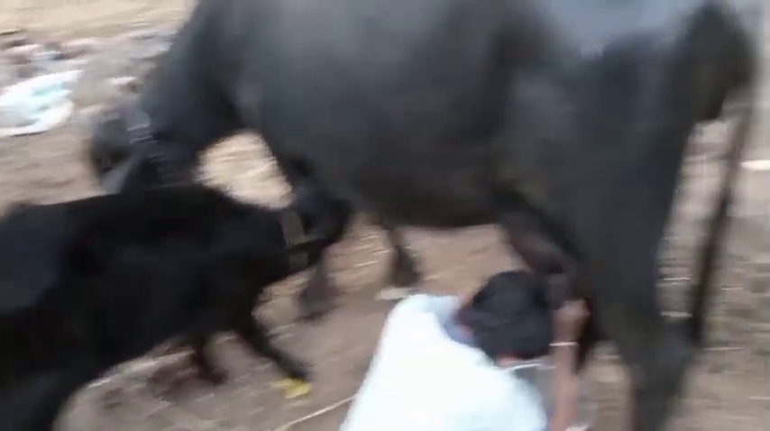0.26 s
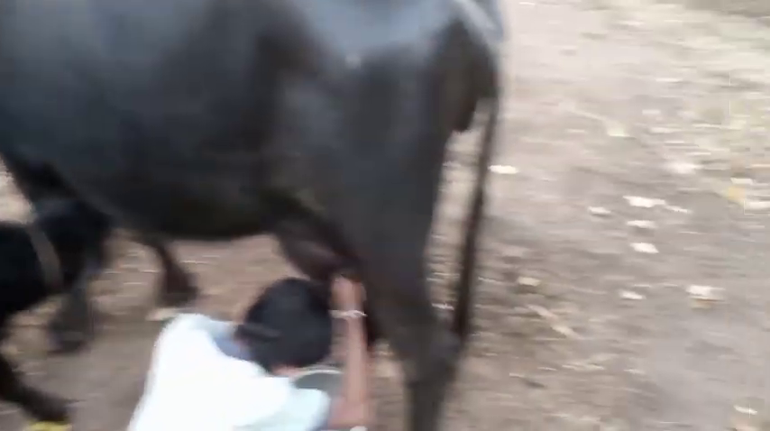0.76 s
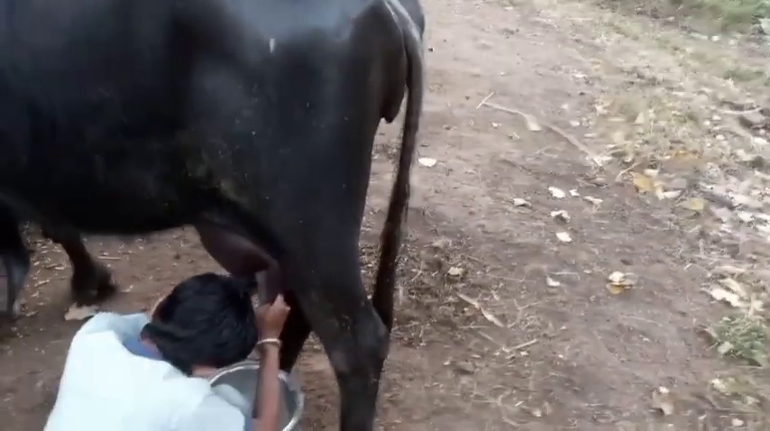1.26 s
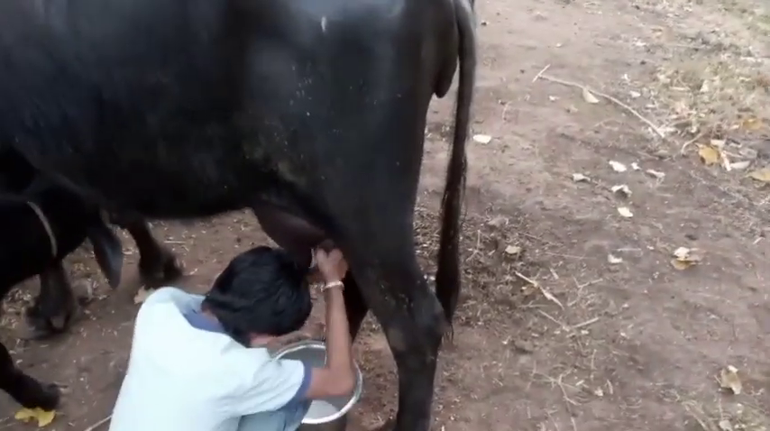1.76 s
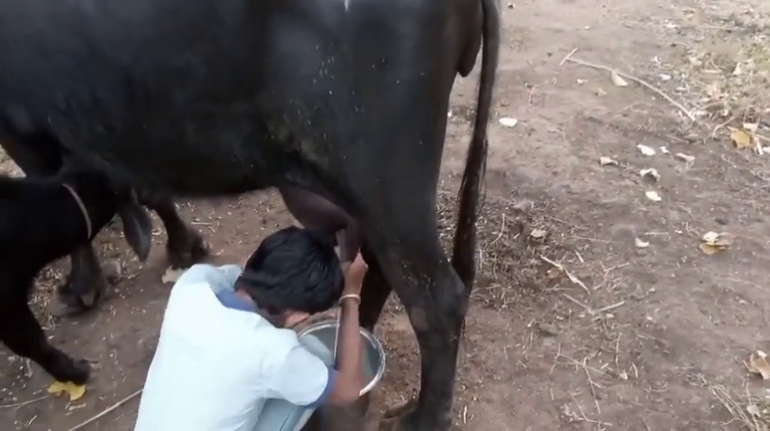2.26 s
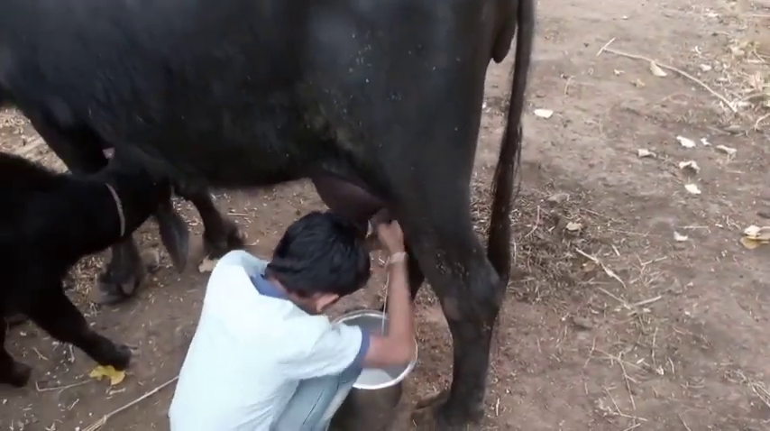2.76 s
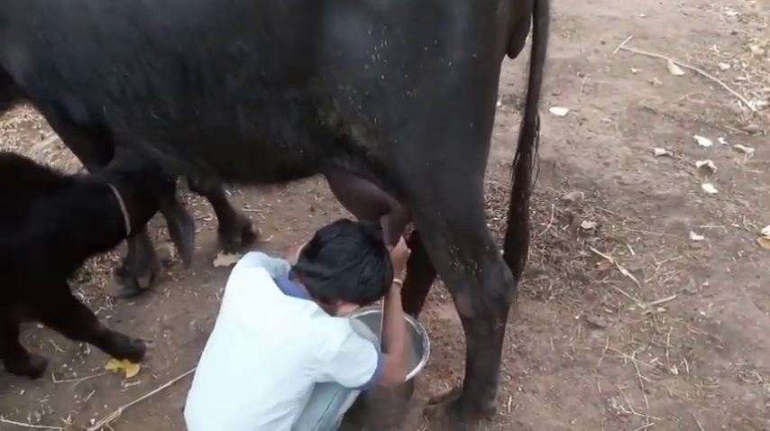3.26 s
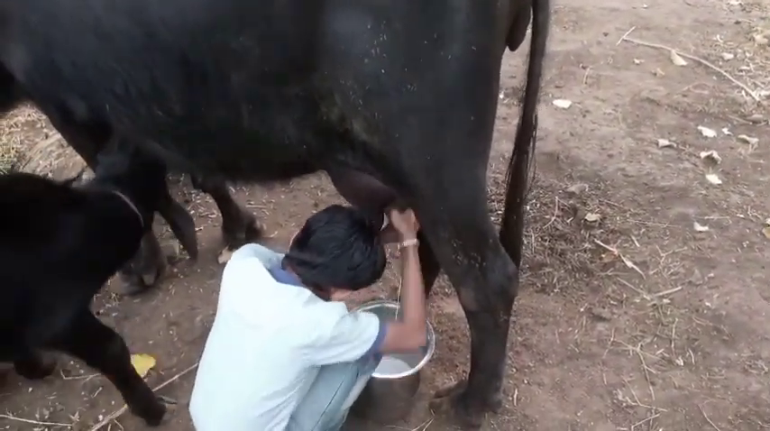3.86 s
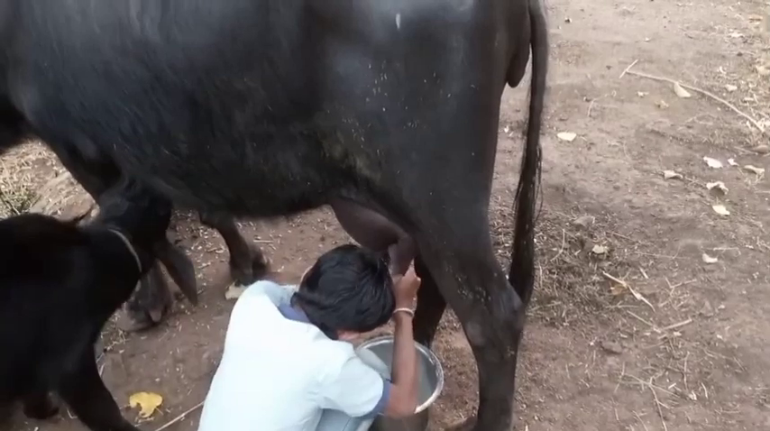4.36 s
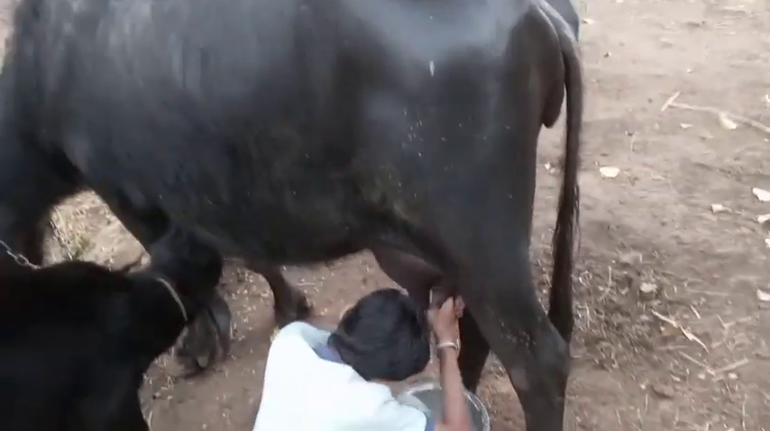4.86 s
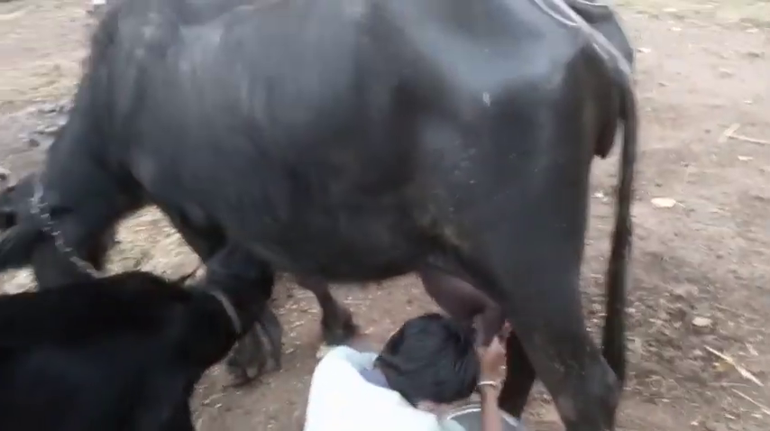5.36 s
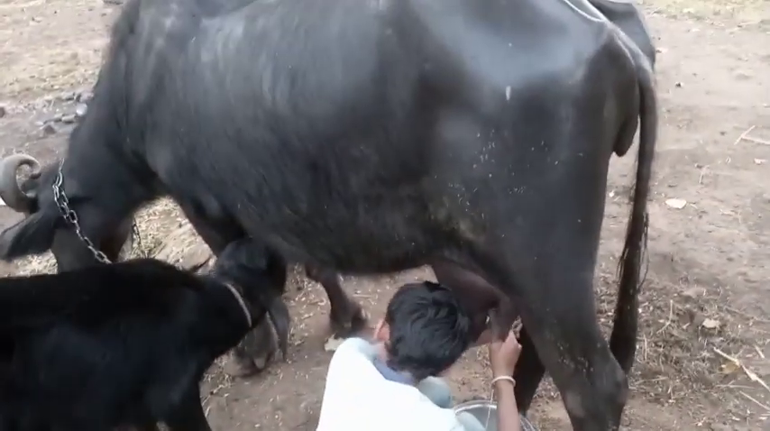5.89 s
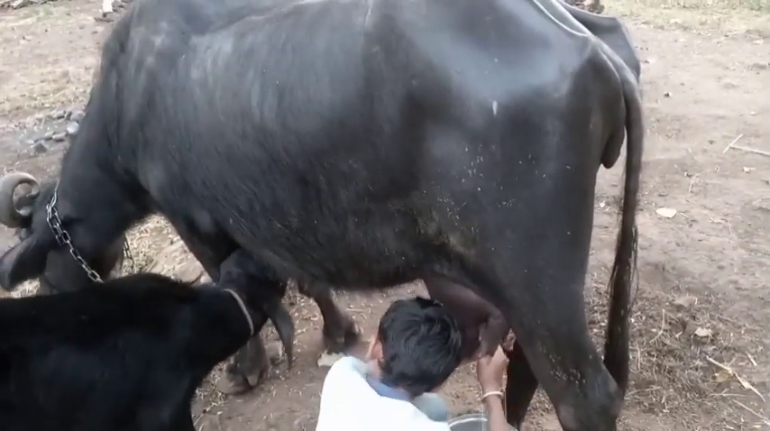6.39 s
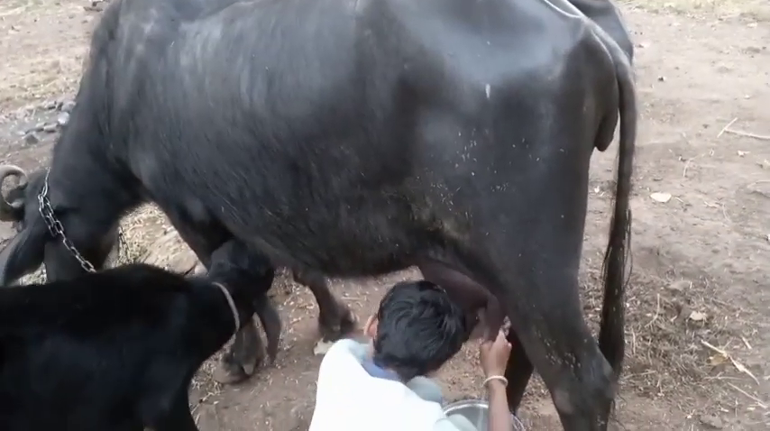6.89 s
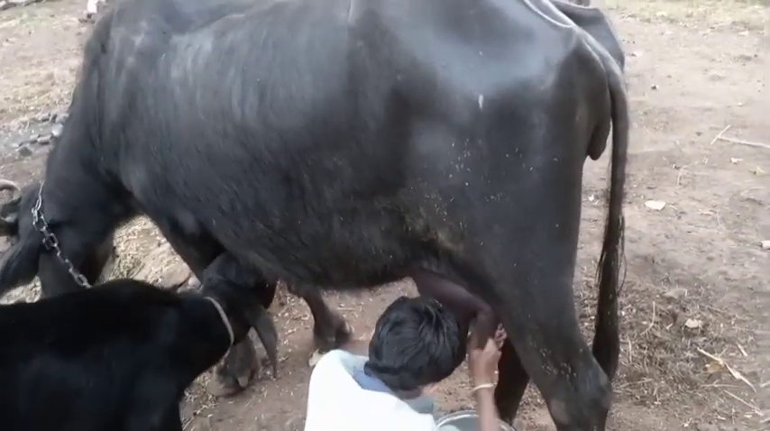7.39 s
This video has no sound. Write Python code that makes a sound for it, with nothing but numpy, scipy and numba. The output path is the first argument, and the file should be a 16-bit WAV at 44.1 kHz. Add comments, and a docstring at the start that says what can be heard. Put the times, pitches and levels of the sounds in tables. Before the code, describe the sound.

Buffalo milk squirts in quick rhythmic jets into a frothy steel pail, hissing and gurgling, with a sharp click and faint bird notes in quiet outdoor air.

```python
"""In an open yard, a buffalo is milked by hand into a steel pail that already holds frothy milk.
Each jet first splashes and sprays droplets on the froth, then digs in and churns up larger, lower bubbles.
Swarms of ringing bubbles and fine hiss make the milk and foam; echoes and moving resonances make the pail.
Around it lie a sharp click, dull thuds and a few gliding bird notes made of plain sines,
with hooves shifting and quiet outdoor air made of filtered noise."""
import sys
import numpy as np
from scipy import signal
from scipy.fft import rfft, irfft
from scipy.io import wavfile
from scipy.ndimage import uniform_filter1d, map_coordinates
from numba import njit

SR = 44100
rng = np.random.default_rng(int(sys.argv[2]) if len(sys.argv) > 2 else 0)


def pcm_store(signal):
    """Save signal as 16-bit PCM."""
    levels = np.round(np.clip(np.atleast_2d(signal), -1, 1) * 32767)
    wavfile.write(sys.argv[1], SR, levels.astype(np.int16).T)


N = 336483
T = np.arange(N) / SR


def undb(db):
    """Decibels to gain."""
    return 10 ** (np.asarray(db) / 20)


def curves(table):
    """The columns of a table, joined by straight lines in time."""
    s, *columns = np.transpose(table)
    return [np.interp(T, s, column) for column in columns]


def current_row(times):
    """Which row of a table holds at each moment: the latest one to have started."""
    return np.maximum(np.searchsorted(times, T, "right") - 1, 0)


def colour(x, points):
    """Shape the tone to a (frequency [Hz], level [dB]) outline, without any sound before its cause."""
    hz, db = np.transpose(points)
    size = 2048
    grid = np.maximum(np.fft.rfftfreq(size, 1 / SR), 1)
    outline_db = np.interp(np.log(grid), np.log(hz), db)
    # folding the cepstrum forward in time gives a minimum-phase filter
    cepstrum = irfft(np.log(undb(outline_db)))
    cepstrum[1:size // 2] *= 2
    cepstrum[size // 2 + 1:] = 0
    impulse = irfft(np.exp(rfft(cepstrum)))
    return signal.fftconvolve(x, impulse)[:len(x)]


def high_pass(order, hz):
    """Filter sections that keep what lies above hz."""
    return signal.butter(order, hz, "high", fs=SR, output="sos")


def steady(x, span_s):
    """Even out the loudness to about unit rms over each span; quicker flutter stays."""
    power = uniform_filter1d(x * x, int(span_s * SR))
    power = uniform_filter1d(power, int(span_s * SR / 2))
    return x / np.sqrt(np.abs(power) + 1e-12)


def walk(rate):
    """A random wander with unit spread: a new level every 1 / rate seconds, joined smoothly."""
    hold = int(SR / rate)
    levels = np.repeat(rng.standard_normal(N)[:N // hold + 1], hold)
    wander = uniform_filter1d(levels, hold)[:N]
    return wander / wander.std()


def add(out, s, sound, db):
    """Lay a short sound into the track at the given peak level."""
    i = max(int(s * SR), 0)
    scaled = sound * undb(db) / np.abs(sound).max()
    out[i:i + len(sound)] += scaled[:max(N - i, 0)]


@njit
def band(x, hz, width):
    """Band-pass whose centre and width may move; gain 1 at the centre."""
    y, b, low = np.empty(len(x)), 0., 0.
    for i in range(len(x)):
        g, k = np.tan(np.pi * hz[i] / SR), width[i] / hz[i]
        v = (b + g * (x[i] - low)) / (1 + g * (g + k))
        b, low, y[i] = 2 * v - b, low + 2 * g * v, k * v
    return y


def resonate(x, hz, width_hz, lift_db):
    """Lift the sound around a moving resonance."""
    return x + (undb(lift_db) - 1) * band(x, hz, width_hz * np.ones(N))


@njit
def ring(start, hz, cycles, size, rise):
    """Each bubble is a damped sine whose pitch climbs as it nears the surface."""
    out = np.zeros(N)
    for k in range(len(start)):
        life, phase = cycles[k] * SR / hz[k], 0.  # life in samples
        first = int(start[k] * SR)
        for i in range(min(int(life), N - first)):
            phase += 2 * np.pi * hz[k] * (1 + rise * i / life) / SR
            out[first + i] += size[k] * np.exp(-6 * i / life) * np.sin(phase)
    return out


def bubbles(low_hz, high_hz, per_s, cycles, spread_db, rise):
    """A swarm of bubbles of uneven strength, pitched between two edges that may move."""
    when, pitch, life, size = rng.random((int(per_s * N / SR), 4)).T
    start = when * N / SR
    low = np.interp(start, T, low_hz * np.ones(N))
    high = np.interp(start, T, high_hz * np.ones(N))
    strength = undb(-spread_db * np.log(np.maximum(size, .02)))
    return ring(start, low * (high / low) ** pitch, cycles * (.5 + life), strength, float(rise))


def spatter(per_s, spread_db, hiss_db):
    """Dense ticks of very uneven size over a thin hiss."""
    signs = rng.choice([-1, 1], N)
    sizes = undb(spread_db * np.minimum(rng.exponential(size=N), 5))
    ticks = (rng.random(N) < per_s / SR) * signs * sizes
    return ticks / ticks.std() + undb(hiss_db) * rng.standard_normal(N)


def walls(x, count=6):
    """The sound bounces across the pail; the paths shift as the jet wanders, so the colour keeps changing."""
    echo, path_s, wander_s = .22, .0006, .00017  # gain of each bounce; its delay; how far the delay drifts
    out = x.copy()
    for k in range(count):
        drift = wander_s * uniform_filter1d(walk(4), SR // 5)
        lag = path_s * (k + 1 + rng.random()) + drift
        out += echo * map_coordinates(x, [(T - lag) * SR], order=3)
    return out


# tone of the quiet outdoor air: (frequency [Hz], relative level [dB])
YARD = [(25, -19), (60, -3.5), (120, 1.5), (250, -7), (600, -8), (950, -6.5), (1500, -4), (5000, -17),
        (15000, -20)]


def yard(level_db=-69.7, swell_db=1.4, per_s=5.6):
    """Quiet outdoor air: shaped noise that swells and sinks a little."""
    air = colour(rng.standard_normal(N), YARD)
    return air / air.std() * undb(level_db + swell_db * walk(per_s))


# stretches of jet flow; one pull on a teat may take several rows:
# (start [s], length [s], swell to full pressure [s], digs in after [s],
# pressure fade after the swell [dB/s], pitch of the largest bubbles once deep [Hz],
# then levels at full pressure: splash [dB], spray [dB], foam fizz [dB], churning [dB])
FLOWS = [(0.0, 0.1, 0.0021, 0.062, 4, 410, -57.5, -57.5, -61, -63),
         (0.121, 0.12, 0.039, 0.021, 42, 535, -51.5, -47, -47, -64),
         (0.255, 0.23, 0.021, 0.2, 7.5, 468, -48.5, -52.5, -55.5, -56.5),
         (0.573, .51, 0.083, 0.11, 17, 333, -48, -53, -57, -56),
         (1.105, 0.096, 0.016, 0.095, 24, 450, -47.5, -52, -55, -47.5),
         (1.195, 0.16, 0.03, 0.032, 24, 398, -37.5, -51, -56.5, -51),
         (1.349, 0.24, 0.1, 0.0018, 47, 315, -47.5, -51.5, -56.5, -56.5),
         (1.605, 0.26, 0.11, 0.14, 26, 335, -44, -50, -56.5, -53.5),
         (1.909, 0.21, 0.0072, 0.049, 29, 393, -56, -56.5, -63, -56),
         (2.084, 0.34, 0.11, 0.008, 31, 500, -47.5, -47, -55, -57.5),
         (2.271, 0.31, 0.11, 0.0026, 11, 318, -49.5, -54.5, -54.5, -56.5),
         (2.618, 0.23, 0.041, 0.036, 20, 405, -49.5, -48.5, -55.5, -57),
         (2.871, 0.21, 0.011, 0.092, 45, 544, -55.5, -56.5, -56, -58),
         (3.096, 0.045, 0.029, 0.081, 18, 600, -49, -50.5, -54.5, -43),
         (3.154, 0.13, 0.054, 0.088, 15, 776, -42, -47.5, -50.5, -47.5),
         (3.293, 0.055, 0.019, 0.0016, 17, 302, -43, -44, -48, -47.5),
         (3.383, 0.28, 0.036, 0.012, 70, 483, -43.5, -45.5, -48, -49),
         (3.687, 0.43, 0.14, 0.12, 53, 310, -47.5, -48.5, -53.5, -55.5),
         (4.05, 0.1, 0.075, 0.0096, 23, 327, -54.5, -52, -71, -68),
         (4.195, 0.11, 0.022, 0.01, 12, 418, -65, -54.5, -54.5, -61.5),
         (4.317, 0.4, 0.17, 0.0284, 35, 332, -51, -51.5, -50.5, -53.5),
         (4.726, 0.27, 0.059, 0.043, 22, 392, -50, -49, -49.5, -55),
         (4.985, 0.35, 0.055, 0.002, 37, 430, -58, -61.5, -56, -59),
         (5.373, 0.53, 0.17, 0.18, 20, 395, -53.5, -53.5, -54, -52.5),
         (5.889, 0.37, 0.081, 0.034, 15, 433, -55.5, -59, -58, -65),
         (6.195, 0.26, 0.022, 0.022, 13, 374, -67, -74, -59, -77),
         (6.532, 0.26, 0.016, 0.13, 23, 308, -53, -57.5, -52.5, -62),
         (6.769, 0.26, 0.037, 0.0018, 42, 385, -49, -55.5, -51, -54.5),
         (7.07, 0.2, 0.03, 0.028, 43, 360, -53.5, -55, -50.5, -56),
         (7.271, 0.34, 0.008, 0.029, 14, 458, -66, -56.5, -56.5, -60.5),
         (7.567, .1, 0.029, .12, 17, 500, -50, -61, -55, -53)]
ATTACK_S, RELEASE_S, SWELL_DB = 0.0016, 0.037, 7  # the flow starts, stops; the pressure builds by this much
SPRAY_SHARE, FIZZ_SHARE, CHURN_SHARE = 0.94, 1, 0.71  # how closely each follows the pressure
SHALLOW_HZ, SINK_S = 1111, 0.019  # largest bubbles while the jet is on the froth; time it takes to sink
BREAK_S, CLEAR_S = 0.026, 0.021  # time to break through the froth; for a new flow to still old churning
FROTH_SPRAY_DB, SHALLOW_DB = 3, -18  # change in spray and in churning while the jet is on the froth
REST_DB = [[-66], [-62], [-58], [-77]]  # milk settling between flows: splash, spray, fizz, churning


def jets(waver_db=1.15, waver_per_s=16):
    """Each stretch of flow swells and fades with the hand's pressure, breaks through the froth and sinks.
    Gives the levels in dB of splash, spray, fizz and churning, and the pitch of the largest bubbles."""
    power = undb(REST_DB) ** 2 * np.ones(N)
    dig_hz = np.full(N, float(SHALLOW_HZ))
    for s, length, swell, digs, fade, deep_hz, splash_db, spray_db, fizz_db, churn_db in FLOWS:
        span = slice(max(int(s * SR), 0), int((s + 2 * length) * SR))
        age = np.maximum(T[span] - s, 0)
        flow = np.minimum(age / ATTACK_S, 1) * np.exp(-np.maximum(age - length, 0) / RELEASE_S)
        pressure_db = -SWELL_DB * np.maximum(1 - age / swell, 0) - fade * np.maximum(age - swell, 0)
        on_froth = .5 - .5 * np.tanh((age - digs) / BREAK_S)  # 1 on the froth, 0 once through
        # a jet on the froth ends the churning left from before
        power[3, span] *= 1 - flow * on_froth * (1 - np.exp(-age / CLEAR_S))
        levels_db = [splash_db + pressure_db,
                     spray_db + SPRAY_SHARE * pressure_db + FROTH_SPRAY_DB * on_froth,
                     fizz_db + FIZZ_SHARE * pressure_db,
                     churn_db + CHURN_SHARE * pressure_db + SHALLOW_DB * on_froth]
        power[:, span] += (flow * undb(levels_db)) ** 2
        sinking = np.exp(-np.maximum(age - digs, 0) / SINK_S)
        dig_hz[span] = deep_hz + (SHALLOW_HZ - deep_hz) * sinking
    levels = [10 * np.log10(p) + waver_db * walk(waver_per_s) for p in power]
    return *levels, dig_hz


# each spot where the jet lands wakes the pail differently:
# (from time [s], hollow resonance [Hz], bright resonance [Hz], lift of the bright one [dB])
LANDINGS = [(0, 1970, 2650, 9), (.125, 1990, 4550, 3.5), (.254, 1890, 2910, 7.5), (.57, 2090, 3280, 6.5),
            (1.102, 2190, 3250, 4), (1.197, 2180, 3450, 6.5), (1.61, 2150, 3980, 6),
            (1.75, 1880, 3550, 6.5), (2.078, 2100, 3900, 3), (2.861, 1920, 4180, 8),
            (3.11, 2060, 3980, 8.5), (3.391, 1930, 4280, 6), (4.049, 1920, 4180, 7.5),
            (4.721, 2050, 4550, 8), (4.989, 1930, 2950, -2), (5.379, 2020, 4230, 5.5),
            (5.95, 2010, 2990, 2.5), (6.533, 1860, 3250, 7.5), (7.271, 2080, 3100, 12.5),
            (7.36, 2020, 3060, 6.5), (7.57, 2040, 3200, 16)]


def landings(hollow_drift=.018, bright_drift=.035):
    """The pail's two resonances waver while the jet stays near one spot, and slide quickly to the next."""
    s, *columns = np.transpose(LANDINGS)
    spot = current_row(s)
    hollow_hz, bright_hz, lift_db = (uniform_filter1d(c[spot], SR // 50) for c in columns)
    return hollow_hz * (1 + hollow_drift * walk(25)), bright_hz * (1 + bright_drift * walk(30)), lift_db


def beads(per_s=70, decay_s=.003, depth=.7):
    """The jet breaks into beads: each lifts the sound at once and fades in a few milliseconds."""
    hits = (rng.random(N) < per_s / SR) * rng.uniform(0.98, 1, N)
    return 1 + depth * signal.lfilter([1], [1, -np.exp(-1 / (decay_s * SR))], hits)


# tone of the splash inside the pail: (frequency [Hz], relative level [dB])
SPLASH = [(900, -49), (1280, -8), (1470, 2.5), (1600, -2.5), (1760, 0.5), (2050, 2.5), (2400, -0.5),
          (2700, -2), (3400, -31)]


def splash(dig_hz, sputter, hollow_hz, splash_db, above=1.263, width_hz=190, lift_db=9, hard_db=-46,
           broaden=0.59):
    """Small bubbles where the jet hits ring the air in the pail, more broadly under a hard jet.
    A shallow jet makes only the smaller ones."""
    low_hz = np.maximum(above * dig_hz, 1150)
    swarm = bubbles(low_hz, high_hz=2920, per_s=1900, cycles=41.0, spread_db=1.5, rise=0.2)
    wet = colour(swarm * np.sqrt(sputter), SPLASH)
    width = width_hz * undb(broaden * np.maximum(splash_db - hard_db, 0))
    return steady(resonate(wet, hollow_hz, width, lift_db), span_s=0.53)


# tone of the spray: (frequency [Hz], relative level [dB])
SPRAY = [(1000, -43), (1700, -18), (2500, -10), (2900, -0.5), (3350, -2), (3950, 0.5), (4550, 0.5),
         (4900, 1), (5300, -2), (7000, -28)]


def spray(sputter, bright_hz, lift_db, width_hz=400, drops_db=-2, flutter_db=0.8):
    """Droplets thrown off the jet patter on the froth and leave tiny ringing bubbles.
    The pail picks out one bright band."""
    tiny = bubbles(low_hz=2493, high_hz=5335, per_s=2100, cycles=26.0, spread_db=2.5, rise=0.04)
    drops = spatter(per_s=4200, spread_db=1.5, hiss_db=-9)
    wet = tiny / tiny.std() + undb(drops_db) * drops
    wet = wet * sputter * undb(flutter_db * walk(150))
    wet = colour(walls(wet), SPRAY)
    return steady(resonate(wet, bright_hz, width_hz, lift_db), span_s=0.22)


# tone of the foam as the microphone picks it up, with its 15 kHz peak:
# (frequency [Hz], relative level [dB])
FIZZ = [(3500, -69), (5600, -5), (6400, 2.5), (7100, 3.5), (7600, 2), (8000, -1), (8700, -1.5), (9300, -5),
        (9900, -5.5), (11000, -10), (13700, -20.5), (14700, -10), (15700, -7.5), (16000, -19)]
# the brightness above 9 kHz drifts over time: (time [s], average change [dB])
BRIGHTNESS = [(0, 2), (.9, -1.5), (1.4, 4.5), (1.9, -3.5), (2.3, 7), (3.0, -1), (3.7, 3), (4.15, 1),
              (4.5, 1.5), (5.2, -2.5), (5.7, 3.5), (6.3, -6), (6.7, -2), (7.63, -3)]


def fizz(sputter, tiny_db=-1, flutter_db=0.9, flicker_db=3.0):
    """Foam cells burst in a dense soft hiss with tiny high pings; its top brightness drifts and flickers."""
    tiny = bubbles(low_hz=5750, high_hz=11400, per_s=1500, cycles=81, spread_db=3.0, rise=0.019)
    foam = spatter(per_s=4200, spread_db=5.0, hiss_db=0.5) + undb(tiny_db) * tiny / tiny.std()
    foam = foam * sputter * undb(flutter_db * walk(200))
    foam = steady(colour(walls(foam), FIZZ), span_s=0.13)
    treble = signal.sosfiltfilt(high_pass(4, 9000), foam)
    brightness_db = curves(BRIGHTNESS)[0] + flicker_db * walk(18)
    return foam + (undb(brightness_db) - 1) * treble


# tone of the stirred milk inside the pail: (frequency [Hz], relative level [dB])
CHURN = [(170, -55), (280, 3), (470, -1.5), (650, 6), (730, -2), (820, 7.5), (920, 1.5), (1070, 10.5),
         (1280, 3.5), (1600, -17.5)]
# the resonance of the gurgling milk drifts and stands out more or less: (time [s], pitch [Hz], lift [dB])
GURGLE = [(0, 607, 0.5), (2.6, 520, -0.5), (3.3, 900, 8), (4.0, 634, 0), (4.6, 587, 3), (5.1, 600, 2),
          (5.7, 640, -1.5), (6.85, 514, 8), (7.15, 525, 8), (7.45, 623, 11)]


def churn(dig_hz, splash_db, reach_hz=1500, hard_db=-48, reach_slope=0.4, width_hz=130, lump_db=1):
    """The jet drives air under the surface: the deeper, the lower the bubbles.
    A hard jet tears off small ones too, and all come in uneven lumps."""
    reach = reach_hz * undb(reach_slope * np.minimum(splash_db - hard_db, 0))
    top_hz = np.maximum(reach, 1.65 * dig_hz)
    swarm = bubbles(dig_hz, top_hz, per_s=650, cycles=13.5, spread_db=2.0, rise=0.24)
    gurgle_hz, lift_db = curves(GURGLE)
    gurgling = resonate(colour(swarm, CHURN), gurgle_hz, width_hz, lift_db)
    return steady(gurgling, span_s=0.041) * undb(lump_db * walk(28))


# single bubbles that ring out: (time [s], peak level [dB], average pitch [Hz], length [s])
GULPS = [(0.191, -41, 2050, 0.01), (0.203, -38.5, 1880, 0.014), (1.221, -25.5, 2055, 0.012),
         (1.242, -49.5, 525, 0.013), (1.387, -46.5, 458, 0.031), (1.443, -44, 467, 0.015),
         (1.651, -42, 2140, .010), (1.707, -37.5, 2050, 0.025), (1.865, -46, 520, 0.01),
         (2.142, -39, 1954, 0.024), (2.185, -33.5, 2030, 0.0078), (2.731, -47, 474, 0.016),
         (3.156, -35.5, 2830, 0.011), (3.161, -32, 2114, 0.019), (3.231, -30, 2080, 0.0056),
         (3.239, -33, 1725, 0.012), (3.26, -44.5, 920, 0.0087), (3.769, -34, 2050, 0.012),
         (3.781, -38, 2020, 0.027), (4.344, -39, 1950, 0.0067), (5.46, -41, 1804, 0.015),
         (5.466, -51.5, 1140, 0.015), (5.54, -34, 2015, 0.013), (5.567, -47, 870, 0.017),
         (6.469, -42.5, 3200, 0.0048), (6.786, -52, 512, 0.026), (6.86, -51.5, 524, 0.048),
         (6.94, -49.5, 465, 0.019), (7.451, -48.5, 665, 0.018), (7.595, -39, 2023, 0.018),
         (7.606, -36.5, 3200, 0.0066)]


def gulps(waver=0.035):
    """A pocket of air swells into a short ring while the jet feeds it."""
    out = np.zeros(N)
    for s, db, hz, length in GULPS:
        size = int(length * SR)
        pitch = hz * (1 + waver * walk(405)[:size])
        tone = np.sin(2 * np.pi * np.cumsum(pitch) / SR)
        add(out, s, signal.windows.tukey(size, .6) * tone, db)
    return out


# the milk slops in a short lump of bubbles: (time [s], length [s], rms level [dB], middle pitch [Hz])
SLOPS = [(0.471, 0.079, -61, 566), (1.293, 0.21, -56.5, 830), (1.46, 0.1, -53, 805),
         (1.58, 0.078, -60, 850), (2.92, 0.037, -64, 530), (2.995, 0.063, -64, 560),
         (3.84, 0.075, -60, 845), (3.925, 0.13, -57.5, 456), (4.094, 0.029, -56.5, 515),
         (5.144, 0.072, -71, 485), (5.387, 0.061, -58.5, 400), (6.038, 0.07, -63.5, 684),
         (6.133, 0.15, -63, 610), (6.213, 0.12, -65, 497), (6.371, 0.056, -62, 955),
         (6.547, .06, -62, 1210), (6.648, 0.055, -59, 1150), (6.99, .055, -60, 734),
         (7.068, 0.052, -63, 1170), (7.405, .09, -66.5, 850), (7.557, 0.042, -64, 840)]


def slops(spread=1.414):
    """Stirred milk folds over and traps a handful of bubbles of like size."""
    s, _, _, hz = np.transpose(SLOPS)
    pitch = hz[current_row(s)]
    swarm = bubbles(pitch / spread, pitch * spread, per_s=520, cycles=18.5, spread_db=4.0, rise=0.11)
    lumps = np.zeros(N)
    for s, length, db, _ in SLOPS:
        corners = [s, s + length / 4, s + length / 2, s + length]
        lumps += undb(db) * np.interp(T, corners, [0, 1, 1, 0])
    return steady(colour(swarm, CHURN), span_s=0.082) * lumps


# hooves shifting in the dirt: (time [s], rms level at the fullest [dB], rough length [s])
SCUFFS = [(0.514, -60.5, 0.065), (0.583, -61, 0.12), (0.797, -64.5, 0.36), (0.97, -65, 0.081),
          (2.74, -77, 0.14), (3.312, -61.5, 0.11), (3.518, -63.5, 0.22), (5.82, -67, 0.1),
          (6.678, -55.5, 0.12), (7.29, -70, 0.16)]


def scuffs(low_hz=70, high_hz=420):
    """A hoof drags over packed earth: a low rustle that starts quickly and fades."""
    low_band = signal.butter(2, [low_hz, high_hz], "band", fs=SR, output="sos")
    earth = signal.sosfilt(low_band, rng.standard_normal(N))
    press = np.zeros(N)
    for s, db, length in SCUFFS:
        press += undb(db) * np.interp(T, [s, s + length / 4, s + 1.15 * length], [0, 1, 0])
    return steady(earth, span_s=0.038) * press


# sudden changes in the jet's force, mostly surges: (time [s], boost or, if negative, dip [dB], decay [s])
SURGES = [(.573, 1, 0.015), (.76, 2, 0.0069), (.814, -2, .008), (.923, 4, 0.0046), (1.655, 4, 0.0065),
          (2.059, 9, .01), (2.136, 9.5, 0.017), (2.650, 5.5, 0.01), (3.154, 8, 0.014), (3.19, 6, 0.0078),
          (4.344, 7.5, 0.023), (5.398, 6.5, 0.03), (5.988, 4.5, 0.028), (6.083, 7, 0.0078),
          (6.109, 11.5, 0.015), (6.465, 9, 0.02), (6.577, 5, 0.011), (6.657, 8.5, 0.024), (6.801, 4.5, .02),
          (7.021, 7.5, 0.044), (7.084, 2, 0.023), (7.272, 7, 0.02), (7.326, 2, 0.0085), (7.459, 9, .008),
          (7.556, 11, 0.015)]


def surges():
    """Extra force in dB: each surge arrives at once and dies away."""
    return sum(db * (T >= s) * np.exp(-np.abs(T - s) / decay) for s, db, decay in SURGES)


# sharp clicks: (time [s], peak level [dB], pitch [Hz], decay [s])
KNOCKS = [(.641, -23, 1270, 0.00045)]
# tone of a click's crack as the microphone picks it up, with its 15 kHz peak:
# (frequency [Hz], relative level [dB])
CRACK = [(1000, -14), (2500, 1), (6000, 12), (9000, 1), (13500, -2), (15200, 8)]


def clicks(crack_s=.0008):
    """A click is a single dry swing with an equally strong crack of noise on top."""
    out, t = np.zeros(N), T[:SR // 10]
    for s, db, hz, decay in KNOCKS:
        add(out, s, -np.sin(2 * np.pi * hz * t) * np.exp(-t / decay), db)
        crack = rng.standard_normal(len(t)) * np.exp(-t / crack_s)
        add(out, s, colour(crack, CRACK), db)
    return out


# dull thuds: (time [s], peak level [dB], starting pitch [Hz], decay [s])
THUDS = [(.642, -42, 375, 0.0021), (4.538, -31.5, 352, 0.0027), (4.814, -34.5, 335, 0.0031),
         (6.697, -41, 530, 0.0037)]


def thuds(sag_s=0.0037):
    """Soft thuds sag in pitch as they die."""
    out, t = np.zeros(N), T[:SR // 10]
    for s, db, hz, decay in THUDS:
        phase = 2 * np.pi * np.cumsum(hz / (1 + t / sag_s)) / SR
        add(out, s, np.sin(phase) * np.exp(-t / decay), db)
    return out


# short bright ticks, mostly drops in the froth, and the snap of a thud near 4.81 s:
# (time [s], peak level [dB], pitch [Hz])
BRIGHT_TICKS = [(0.844, -41, 3830), (1.654, -32, 3930), (2.654, -37, 3270), (3.153, -33, 6800),
                (3.198, -29, 4000), (3.3437, -31, 7200), (3.41, -30.5, 6840), (3.887, -31, 4150),
                (4.060, -36.5, 4820), (4.158, -38, 4020), (4.405, -37, 6460), (4.4756, -32, 6440),
                (4.7694, -39, 4580), (4.811, -31, 4030), (4.814, -31, 6900), (4.9146, -32, 6370),
                (4.924, -36, 7000), (4.941, -36, 6440), (4.956, -29.5, 6980), (5.247, -37.5, 6600),
                (7.085, -51, 6850), (7.558, -33, 7000)]


def bright_ticks(decay_s=0.0041, ring_s=0.00095, spatter_db=-5, width=0.88):
    """A short bright tick: a tiny ring inside a brief burst of noise of like pitch."""
    out, t = np.zeros(N), T[:SR // 20]
    for s, db, hz in BRIGHT_TICKS:
        centre = np.full(len(t), float(hz))
        burst = band(rng.standard_normal(len(t)), centre, width * centre)
        burst = band(burst, centre, width * centre)
        tone = np.sin(2 * np.pi * hz * t) * t / ring_s * np.exp(1 - t / ring_s)
        add(out, s, tone + undb(spatter_db) * burst / burst.std() * np.exp(-t / decay_s), db)
    return out


# a far bird's nearly level note before its whistle: (time [s], pitch [Hz], level [dB])
PEEP = [(6.085, 1404, -74), (6.11, 1450, -60), (6.16, 1370, -59), (6.185, 1400, -74)]
# a far bird's falling whistle: (time [s], pitch [Hz], level [dB])
WHISTLE = [(6.215, 2540, -83), (6.265, 2480, -52), (6.305, 2365, -53.5), (6.345, 2095, -57),
           (6.38, 1920, -59), (6.425, 1640, -70)]
# a far dove's short coo: (time [s], pitch [Hz], level [dB])
COO = [(6.56, 590, -85), (6.595, 560, -53), (6.63, 562, -59), (6.67, 555, -80)]


def bird(call):
    """A pure gliding note: one sine that follows the pitch and level of the call."""
    hz, db = curves(call)
    sounding = (T > call[0][0]) * (T < call[-1][0])
    return sounding * undb(db) * np.sin(2 * np.pi * np.cumsum(hz) / SR)


def scene():
    """The milk in the pail, with the yard around it."""
    splash_db, spray_db, fizz_db, churn_db, dig_hz = jets()
    hollow_hz, bright_hz, lift_db = landings()
    sputter, surge_db = beads(), surges()
    milk = undb(splash_db + surge_db) * splash(dig_hz, sputter, hollow_hz, splash_db)
    milk += undb(spray_db + surge_db) * spray(sputter, bright_hz, lift_db)
    milk += undb(fizz_db + 0.3 * surge_db) * fizz(sputter)  # the foam feels a surge less
    milk += undb(churn_db) * churn(dig_hz, splash_db)
    milk += gulps() + slops()
    birds = bird(PEEP) + bird(WHISTLE) + bird(COO)
    return (yard() + milk + scuffs() + clicks() + thuds() + bright_ticks() + birds)[None]


def record(dry, low_hz=55, top_hz=15850):
    """The phone thins the deep bass and cuts the top."""
    thin = signal.sosfilt(high_pass(3, low_hz), dry)
    return signal.sosfilt(signal.ellip(10, .2, 70, top_hz, fs=SR, output="sos"), thin)


dry = scene()
out = record(dry)
pcm_store(out)
```